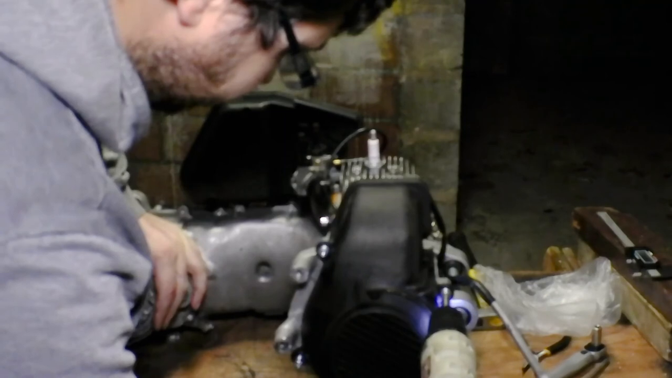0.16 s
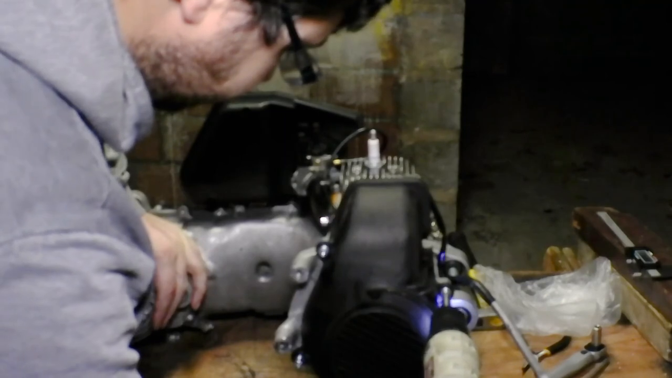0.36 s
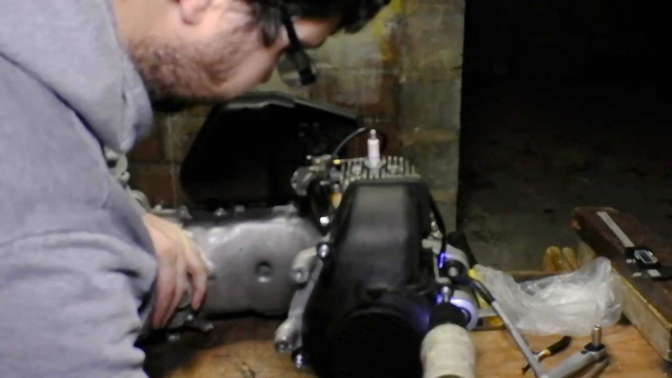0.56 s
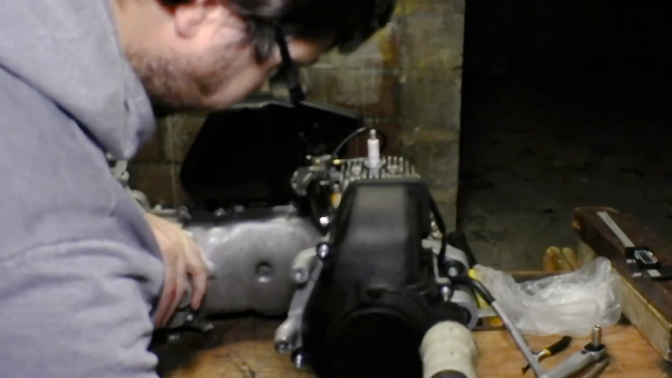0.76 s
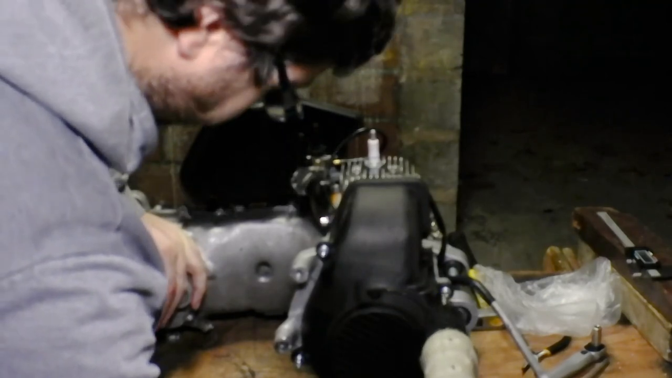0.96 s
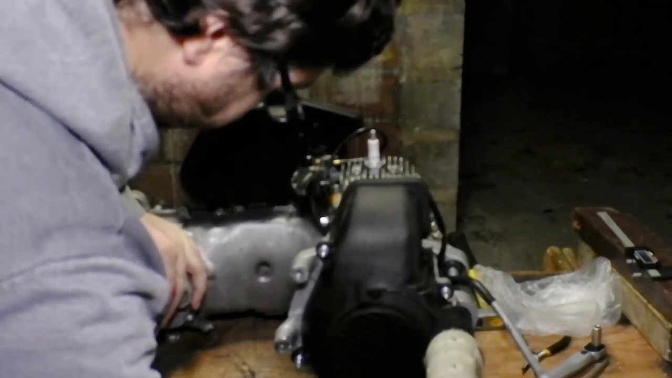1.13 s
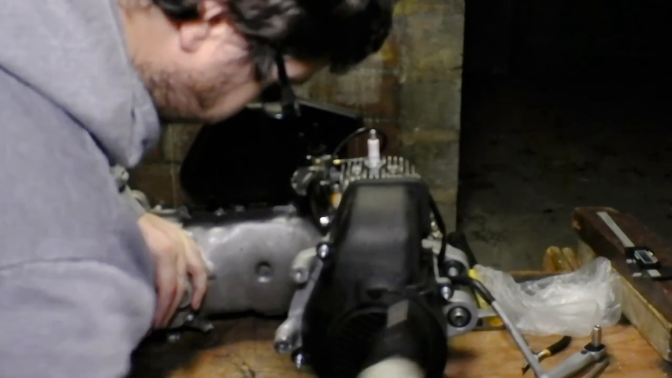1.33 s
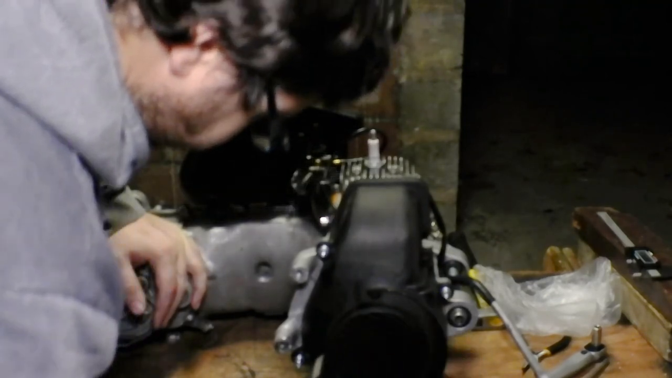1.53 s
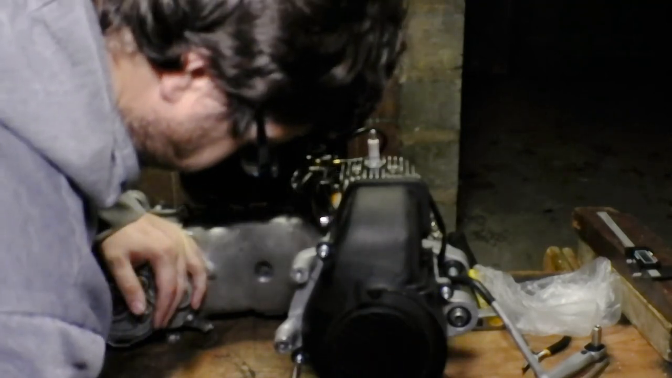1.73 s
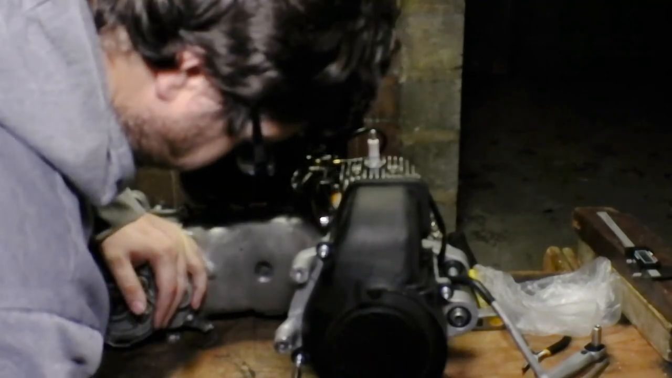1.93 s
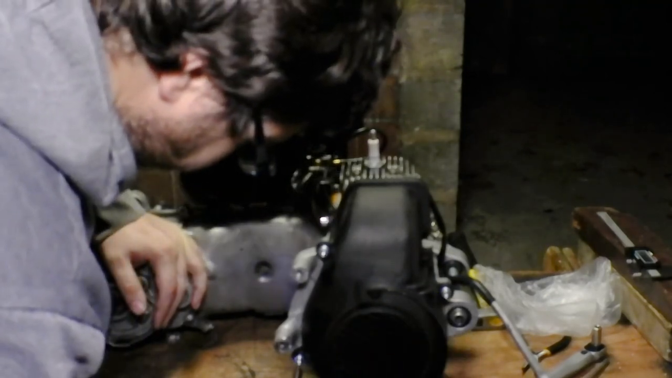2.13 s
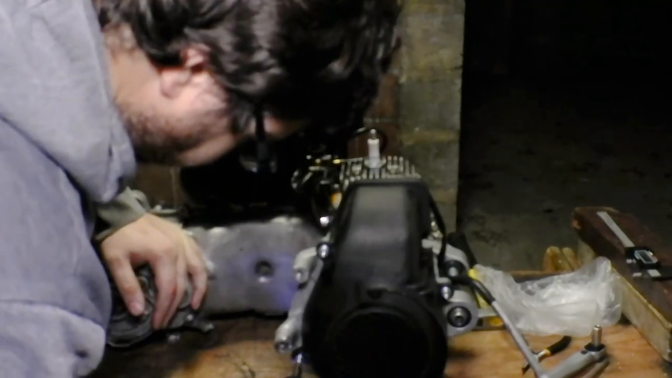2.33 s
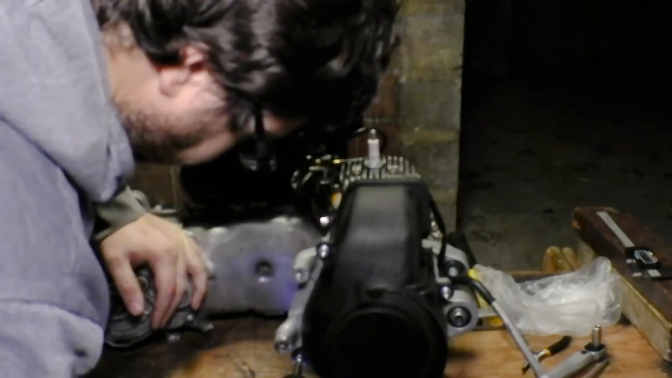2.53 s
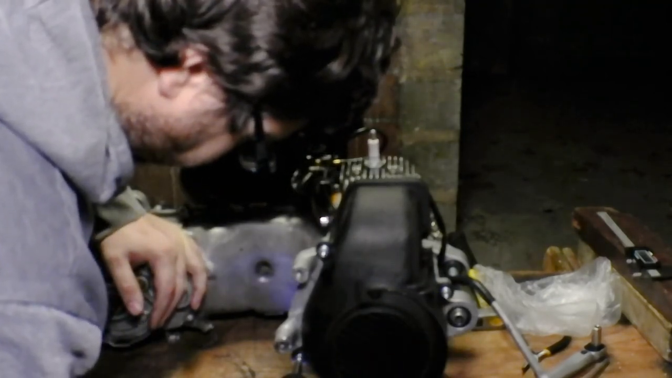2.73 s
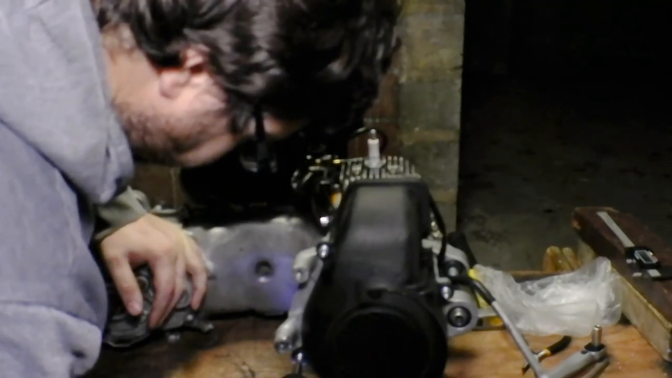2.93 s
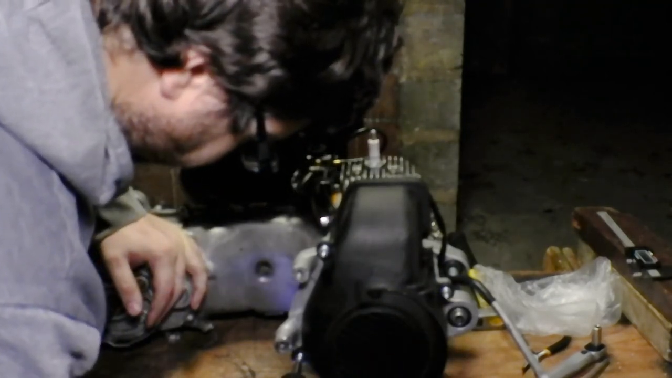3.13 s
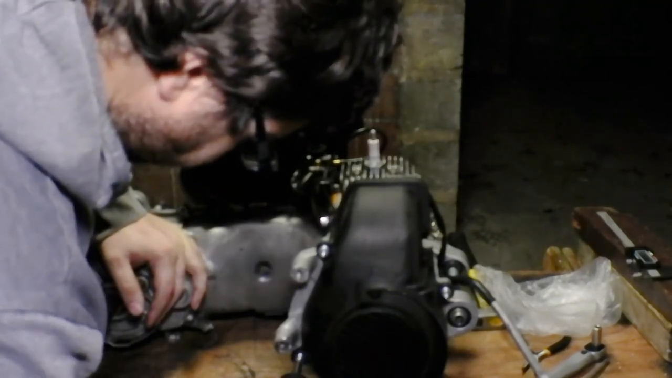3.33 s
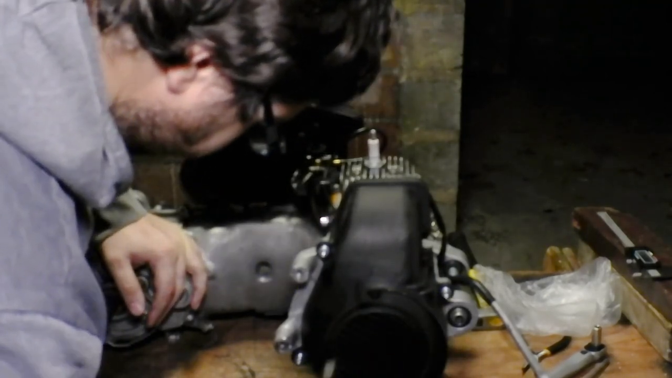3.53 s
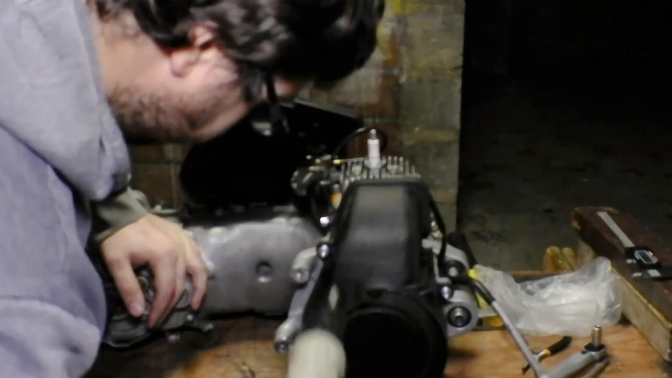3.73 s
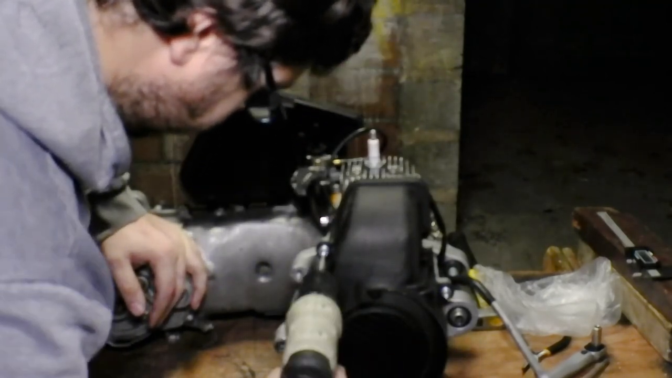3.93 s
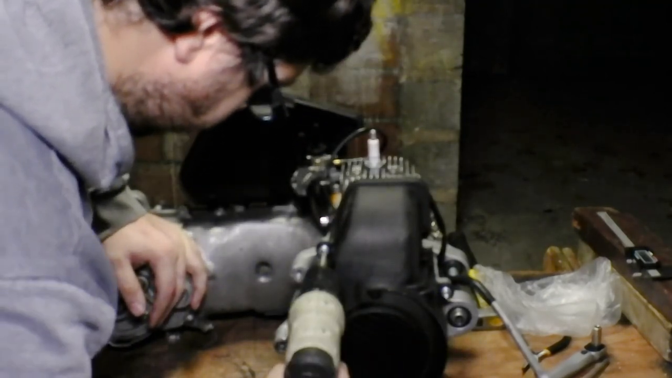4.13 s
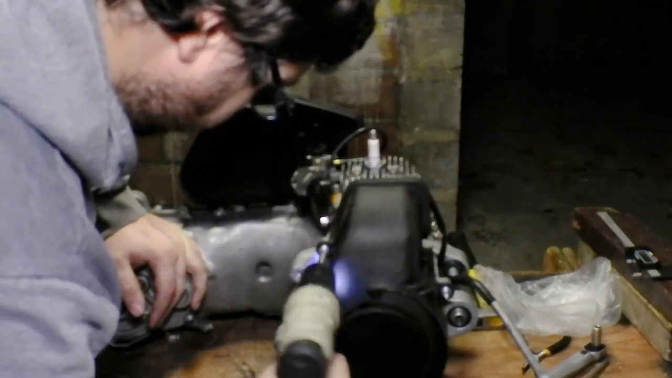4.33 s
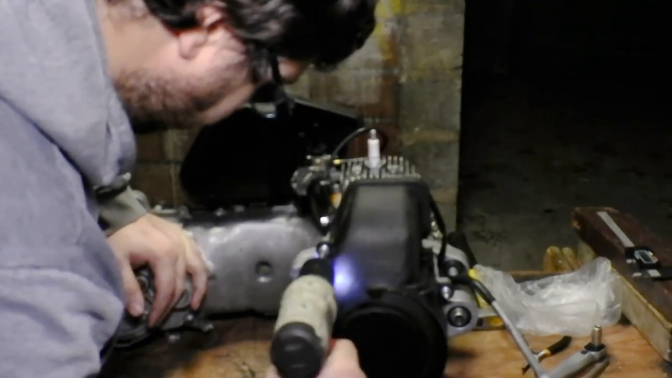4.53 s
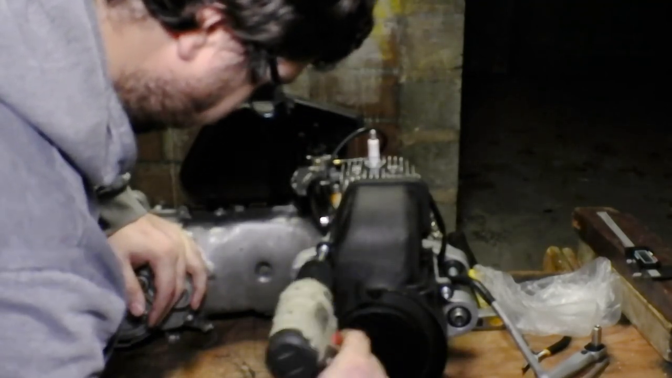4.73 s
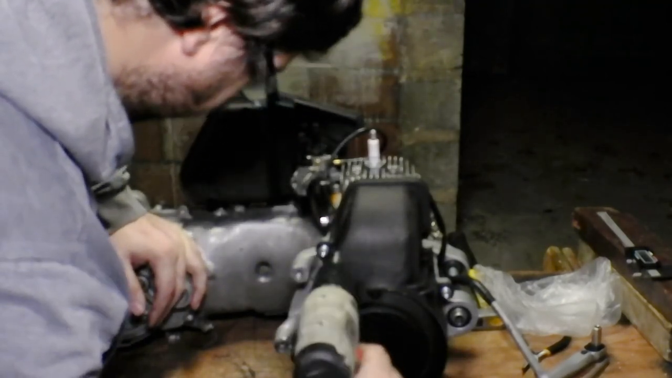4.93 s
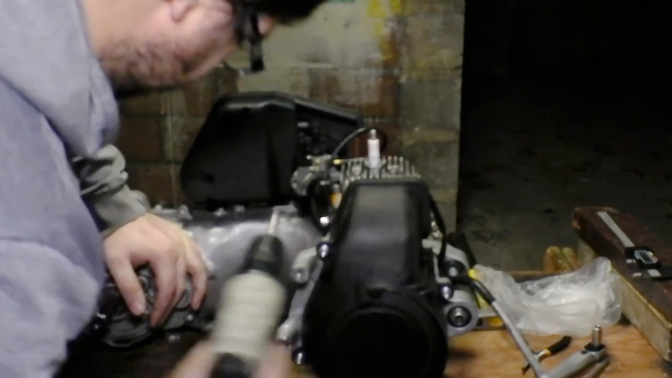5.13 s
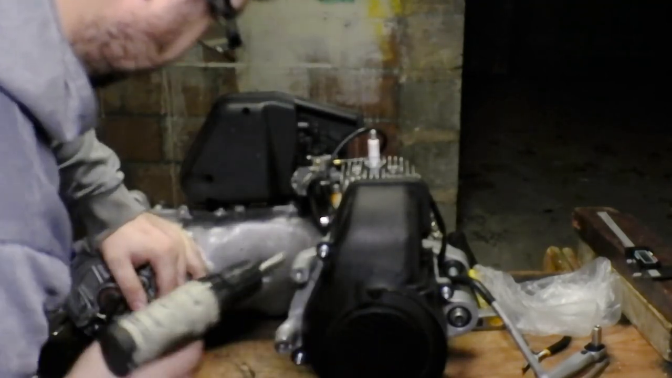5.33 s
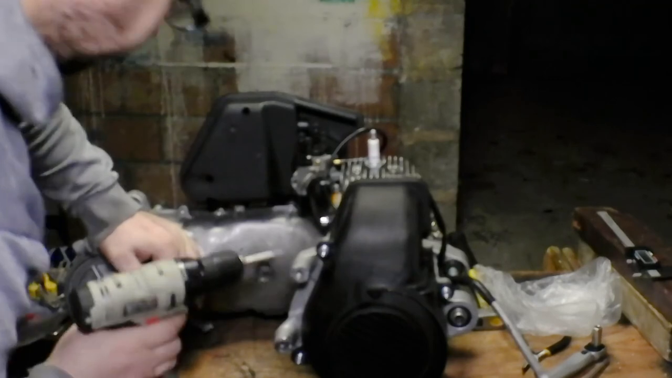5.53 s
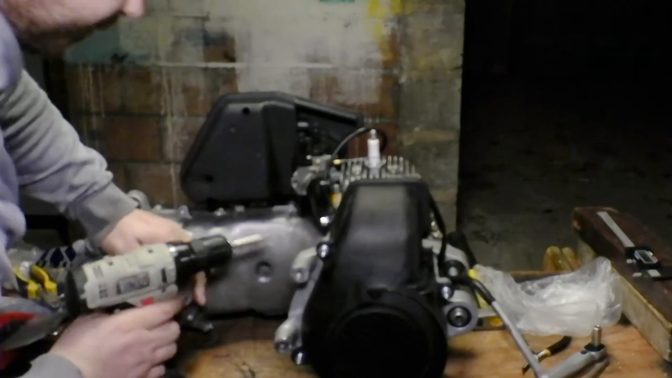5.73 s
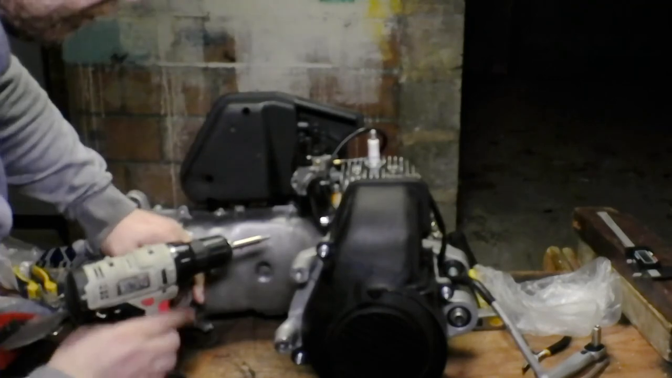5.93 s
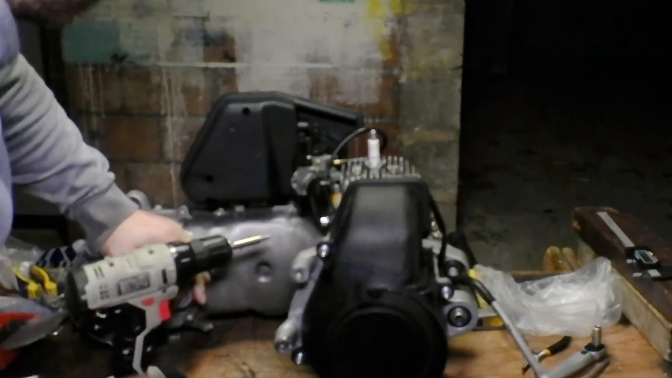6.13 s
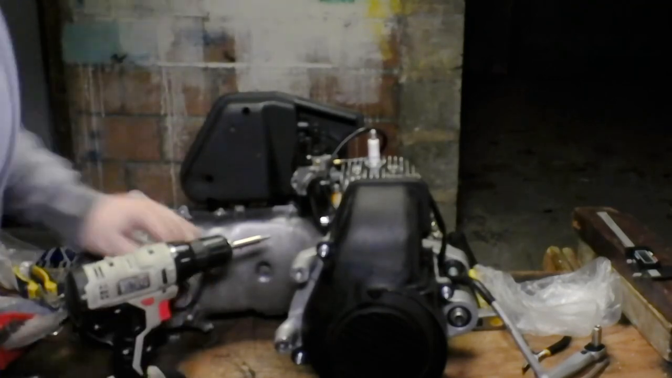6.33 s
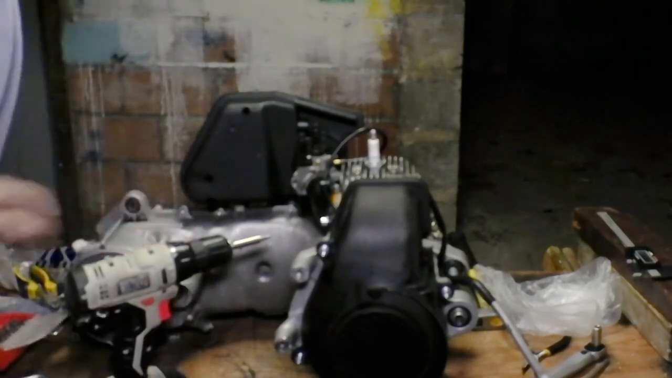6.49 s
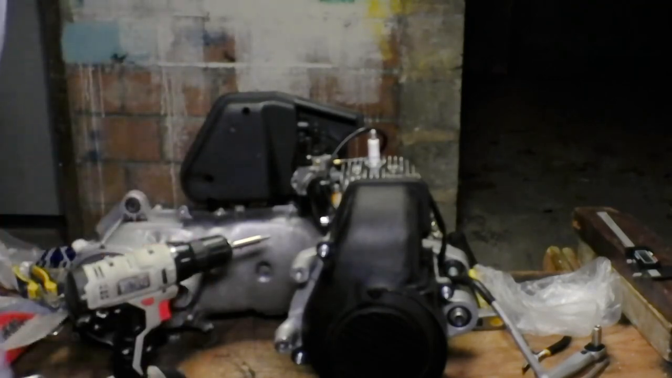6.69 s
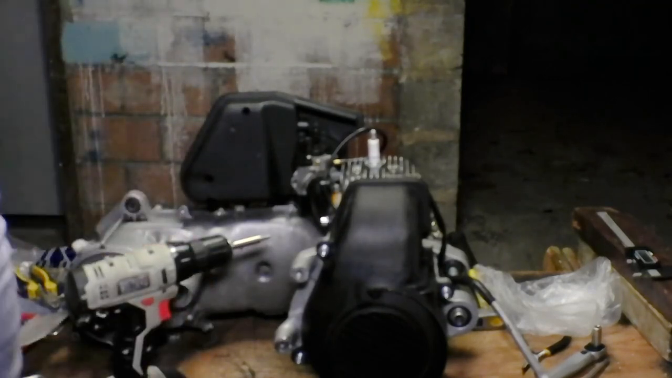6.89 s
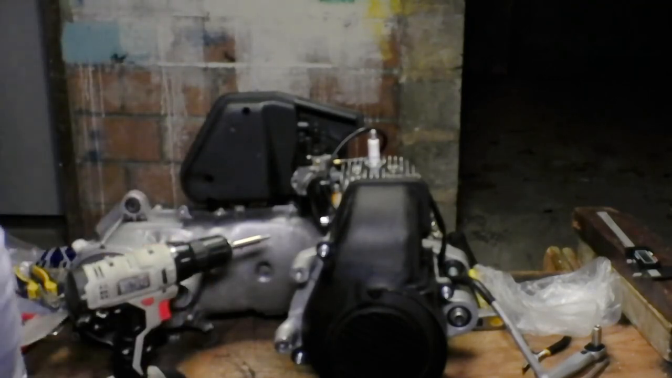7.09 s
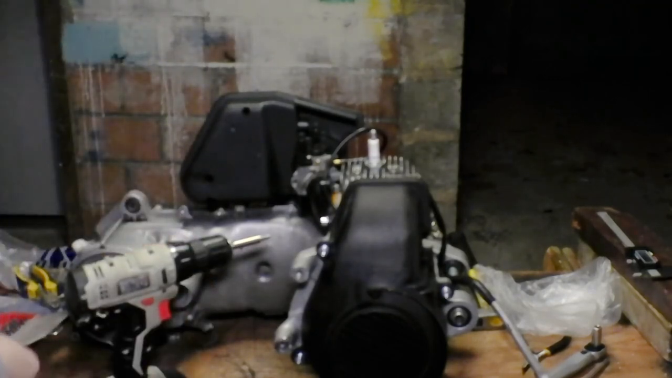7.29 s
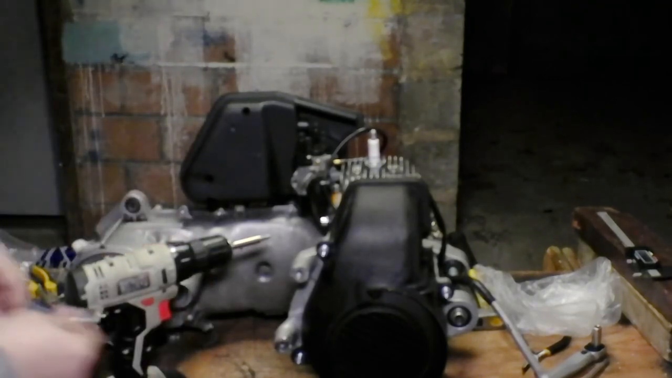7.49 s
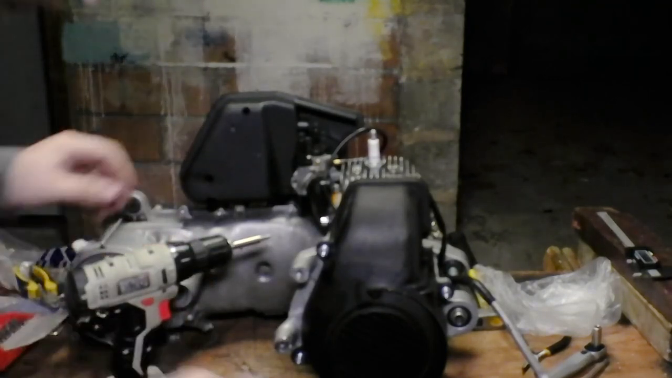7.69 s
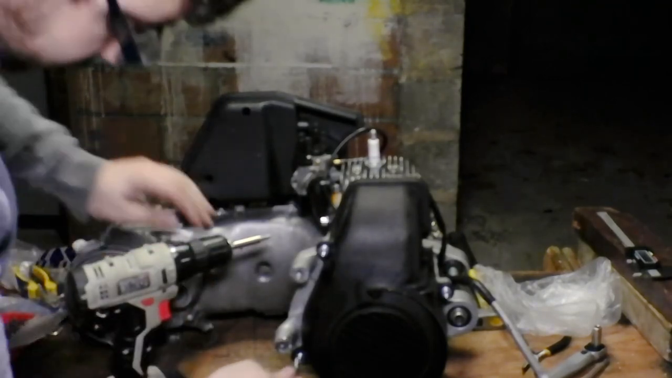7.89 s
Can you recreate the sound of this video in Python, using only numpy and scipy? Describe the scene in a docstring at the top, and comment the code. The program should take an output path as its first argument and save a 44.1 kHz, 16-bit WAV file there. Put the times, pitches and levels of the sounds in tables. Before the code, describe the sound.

A cordless drill is already whirring at the start, a buzzy mid-high motor whine with gear noise. At about 0.35 s the bolt seats with a clink and the clutch rattles in loud, fast metallic chatter until 0.6 s, followed by small chuck clicks near 0.85 s. Quiet room rumble, then light taps around 1.9 s. The motor spins up at 2.1 s with a sharp metal tap, whines steadily, and ratchets from 3.0 to 3.25 s. After a pause, clicks at 4.1-4.3 s lead into a third burst, rattling almost at once until 4.65 s. Strong wooden knocks at 5.4 and 5.5 s, weaker ones to 5.7 s, then a quick rocking flutter. A soft low judder at 6.3 s, faint cloth brush, tiny tool nudges to 7.1 s, a dull tap at 7.6 s and a bright steel clink at 7.9 s. Close, lightly reverberant workshop.

```python
"""A cordless drill-driver runs bolts into a small engine on a wooden bench, in a brick workshop.
It is already whirring; the first bolt seats and the torque clutch rattles, then the bit and chuck clink.
A second bolt is driven the same way after light knocks; a third is tight almost at once.
The drill is stood on the bench and rocks to rest; its foot judders, a sleeve brushes past,
tools are nudged and a small steel part clinks. Motor tones, noise and struck bodies make these sounds."""
import sys
import numpy as np
from scipy import signal
from scipy.io import wavfile

SR = 44100
rng = np.random.default_rng(int(sys.argv[2]) if len(sys.argv) > 2 else 0)


def unload_audio(sound):
    """Save the sound as a 16-bit wav file, at the path given as the first command line argument."""
    columns = np.transpose(np.atleast_2d(sound))
    # keep every value between -1 and 1, then stretch to whole-number steps
    steps = np.round(np.clip(columns, -1, 1) * 32767)
    wavfile.write(sys.argv[1], SR, steps.astype(np.int16))


N = 350595
TIME = np.arange(N) / SR  # t/s

# Trigger pulls, the first already under way: start t/s, bolt seats t/s, stop t/s,
# full speed f/Hz (turns per second), motor level/dB before strain, whine level/dB relative to the motor
PULLS = [(-1, .3616, .615, 343.6, -20.7, -5), (2.12, 2.9772, 3.246, 343.4, -21.5, -5.3),
         (4.288, 4.3246, 4.65, 353.6, -21.5, -12)]
# Hum of the shaft and whine of the commutator: multiple of motor speed, relative level/dB
SHAFT_ORDERS = [(.5, -22), (1, -0.5), (1.5, -15), (2, -7), (3, -9), (4, -15.5), (6, -16), (9, -10),
                (15, -20), (16, -16), (18, -16.5), (19, -21), (21, 0), (22, -12.5), (24, -9.5), (25, -6.5),
                (26, -9), (28, -11.5), (31, -15)]
# Colour of the gear and brush noise: f/Hz, relative level/dB per Hz
GEAR_COLOUR = [(90, -40.5), (170, -22.5), (280, -10.5), (440, -5.5), (520, -2.5), (830, -7), (1150, 1),
               (1550, -1.5), (1850, -7), (3100, -5), (4600, -11), (7000, -6), (10400, -5), (12800, -21.5)]
# Ringing of the drill's housing: f/Hz, relative level/dB, time to fall by 60 dB t60/s
HOUSING_MODES = [(520, -27, .03), (725, -20.5, 0.044), (1154, -7.5, .02), (1490, 0.5, 0.024),
                 (3080, -6.5, .007), (3640, -7.5, 0.0094), (7580, 16.5, 0.0079), (10000, 2, 0.0034)]
# The clutch at each bolt: snap level/dB, chatter level/dB, engine case ring level/dB, jolt level/dB
CLUTCH_LEVELS = [(-14.6, -15.2, -21.5, -18.3), (-14.5, -14.7, -20, -19.5), (-16, -12, -17.5, -20.5)]
# Steel balls landing: f/Hz, relative level/dB per Hz
SNAP_COLOUR = [(60, -22.5), (200, -13), (450, 1), (1000, 1.5), (1500, 0), (2200, -6), (4500, -8.5),
               (6500, 3.5), (8000, 1.5), (10500, -7), (12500, -20), (15000, -55)]
# Loose chatter, one list for each bolt: f/Hz, relative level/dB per Hz
CHATTER_COLOURS = [
    [(24, -47.5), (40, -18.5), (166, -23.5), (197, -14), (377, -4.5), (480, -1), (641, -11.5), (1490, -9),
     (1810, -11.5), (6990, -12), (12800, -26), (16600, -54), (22000, -120)],
    [(24, -68), (40, -21.5), (158, -30.5), (201, -5.5), (239, -22.5), (343, -4), (377, -8.5), (944, -7.5),
     (3920, -14), (7160, -10.5), (12800, -32), (16600, -61), (22000, -120)],
    [(24, -57), (40, -27.5), (311, -19), (480, 0.5), (582, -6.5), (990, -6), (2360, -19.5), (3230, -11.5),
     (4990, -18), (7700, -9.5), (12800, -37), (16600, -63.5), (22000, -120)],
]
# The jolt of a slip, the same colour every time: f/Hz, relative level/dB per Hz
JOLT_COLOUR = [(60, -25.5), (200, -14.5), (400, 0), (500, 2), (750, -3.5), (1000, -2), (1550, -1.5),
               (1900, -11.5), (4000, -23), (9000, -44.5)]

# Bodies that ring when struck: f/Hz, relative level/dB, time to fall by 60 dB t60/s
CASE_MODES = [(206, -14, 0.06), (344, -12, .07), (425, -3, .07), (489, 0.5, 0.1), (548, -4, .07),
              (697, -5.5, 0.066), (830, -3.5, .07), (900, -5.5, .05), (987, 1.5, 0.066), (1040, -6, 0.059),
              (1170, -0.5, 0.087), (1260, -3.5, .04), (1380, -4, .04), (1455, 0, .07), (1504, 1, .07),
              (1554, -3, 0.056), (1640, -8, .05)]  # engine case
BOLT_MODES = [(350, -12, 0.046), (464, -5, 0.06), (725, 2, 0.058), (875, -1, 0.02), (926, 16, 0.037),
              (1100, -4, .035), (1330, -7, 0.044), (1768, -11.5, .03), (3500, -13, .02)]  # bolt heads
BIT_MODES = [(970, -1.5, 0.026), (1850, -15, .04), (2670, -2, 0.14), (3440, 0.5, 0.067), (6050, 1, .035),
             (6970, 0.5, 0.033), (7800, -4.5, 0.035), (10100, -2.5, .04)]  # driver bit
CHUCK_MODES = [(458, -9, .08), (958, -8, .06), (1620, 0, .11), (2175, -4, .07), (2832, -6, .07),
               (3978, -3, .08), (5950, 0, .03), (7400, -3, .06)]  # rattling chuck
BENCH_MODES = [(214, -22.5, 0.13), (313, -9, 0.033), (413, 0, 0.028), (481, 20, 0.047), (520, -2, .05),
               (624, -11.5, 0.07), (770, -5.5, 0.047), (950, -11, .04), (1160, -11, .045),
               (1357, -14, .045)]  # bench top
TOOL_MODES = [(485, -9, 0.22), (530, -21.5, 0.24), (728, -8.5, 0.085), (960, -27, .07), (1400, 2, 0.044),
              (1534, -10, .07), (2160, -7, 0.03)]  # loose tools
PART_MODES = [(1010, 1, 0.031), (2630, -4, 0.054), (3560, -1, .03), (6300, 8, 0.033), (6710, -1, 0.033),
              (8470, 2, 0.031), (9800, -7, .04)]  # small steel part

# Blows: t/s, ring peak level/dB, contact time t/ms, crack level/dB, crack decay t/s
BOLT_TAPS = [(1.917, -39.5, .3, -48, 0.0041), (1.932, -36, 0.33, -47, 0.0026),
             (1.974, -27.5, 0.26, -37, 0.0049), (2.091, -35, 0.12, -43.5, 0.03),
             (2.1668, -7, 0.4, -29, 0.014), (4.107, -17, 0.12, -25, 0.0061),
             (4.154, -34.5, 0.13, -33.5, 0.015), (4.1575, -13, 0.31, -37, 0.0039),
             (4.278, -24, .45, -34, .03), (4.302, -18, .9, -27, .03)]  # bit on bolt heads
BIT_CLINKS = [(.351, -8.5, 0.14, -6, 0.0028), (3.2305, -22, 0.11, -7, 0.0026), (4.3135, -15, .2, -11, .005),
              (4.627, -20, 0.075, -9.5, .003)]  # ringing of the bit
CHUCK_CLICKS = [(.853, -28, .05, -19.7, .0072), (.884, -33, .2, -30.5, .005)]  # the bit is pulled off the tight bolt and the chuck rattles
BENCH_KNOCKS = [(.718, -28.5, 0.6, -43, .004), (1.976, -29.5, 0.62, -47, 0.0043),
                (1.995, -29, 0.8, -42, 0.0036), (5.3712, 4, 0.63, -7.5, 0.007),
                (5.5306, 1.5, 0.75, -19, 0.011), (5.568, -34, 0.93, -27, 0.0047),
                (5.6455, -8, 0.47, -28, 0.012), (5.697, -38, 0.95, -19.5, 0.0055),
                (5.701, -6, 0.43, -26, 0.021), (5.729, -21, .7, -24.5, 0.0056),
                (7.577, -24, 0.75, -46, 0.005)]
TOOL_NUDGES = [(1.155, -41, 0.033, -45.5, .012), (5.939, -36, 0.054, -45, 0.03),
               (6.486, -51, .1, -46, 0.0088), (6.795, -39, 0.83, -44.5, 0.015),
               (6.917, -29.5, 0.33, -42, .02), (6.943, -29.5, 0.91, -48, 0.079),
               (7.075, -49, .3, -44, 0.022), (7.092, -35.5, 0.82, -46, .01)]
PART_CLINKS = [(7.9245, -14, 0.03, -33, 0.0055), (7.936, -27, .03, -41, .004)]

# Colour of each kind of crack: f/Hz, relative level/dB per Hz
TAP_CRACK = [(100, -22.5), (420, 0.5), (1200, 4), (2500, -8.5), (3600, -5), (5000, -17), (9500, -16.5),
             (12500, -28), (15000, -58)]
CLINK_CRACK = [(100, -17.5), (500, -5.5), (1600, 0), (3000, -2), (5000, -7), (7000, -1.5), (10000, -6),
               (12500, -14.5), (15000, -49.5)]
BENCH_CRACK = [(80, -28), (250, -10), (700, 9.5), (1400, -0.5), (2500, -18.5), (5000, -27.5), (9000, -29.5),
               (12500, -40.5), (15000, -52.5)]
TOOL_CRACK = [(150, -5.5), (500, 5), (900, -1), (1400, -3.5), (2200, -10), (3500, -22), (8000, -20),
              (13000, -22.5)]

# Strokes: start t/s, attack t/s, hold t/s, release t/s, level/dB, sag/dB per s
FOOT_JUDDER = (6.307, .014, .065, .012, -34, 70)  # the foot judders over the wood as the hand lets go
SLEEVE_BRUSH = (6.47, .03, .35, .07, -55.5, 14)  # a sleeve brushes past
# Ringing under the juddering foot: f/Hz, relative level/dB, time to fall by 60 dB t60/s
FOOT_MODES = [(278, -4, 0.036), (331.6, 2, 0.069), (425, -6, 0.035)]
# Hiss of cloth: f/Hz, relative level/dB per Hz
CLOTH_COLOUR = [(300, -1), (1200, -2), (2200, 0.5), (3000, -6), (5000, -27), (12000, -33)]

# Room rumble and hiss: f/Hz, relative level/dB per Hz
BACKGROUND_COLOUR = [(15, -62), (25, -32.5), (37, -29), (53, -14.5), (102, 0), (126, -11), (186, -3),
                     (248, -10), (276, -1.5), (367, -8.5), (397, -1), (430, -13), (558, -9), (743, -15.5),
                     (12800, -24.5), (16600, -50.5), (22000, -120)]
# Echoes from the walls: f/Hz, time to fall by 60 dB t60/s
ROOM_DECAY = [(100, 0.24), (300, 0.49), (600, 0.32), (1500, 0.34), (3500, .37), (8000, 0.25), (13000, 0.37)]
# Low tones standing between the walls: f/Hz, relative level/dB, time to fall by 60 dB t60/s
STANDING_MODES = [(98, -9, 2.4), (204, -3.5, 2.5), (269.7, 2, 1.4), (390, -11, 1.9)]

SPIN_UP_S, BRAKE_S = .026, .025
LOUDNESS_POWER, STRAIN_DB, STRAIN_S = 1.25, 2.2, .06  # louder with speed, and again under strain
CREEP_S, CREEP_DB, WHISTLE_HZ, WHISTLE_DB = .02, -41, 3350, -47
TURNS_PER_SLIP, LAST_SLIP_S = 5, .033  # slipping ends this long before the motor stops
TIGHTEN_DB_PER_S = 8  # the tighter the bolt, the more of each slip reaches the case
JOLT_LEAD_S = .001  # the balls push off the cam just before they land
RECOIL_LEAD_S = .03
ROCK_START_S, ROCK_GAP_S, ROCK_SHRINK = 5.7615, .022, .9  # each gap is .9 of the one before
ROCK_DB, ROCK_LOSS_DB, ROCK_CONTACT_MS = -22, .4, 1.55  # the loss is per bump
BACKGROUND_DB = -56
EDGE_HZ = 12850


def motor(wobble=0.0009, gears_db=-3, housing_db=-8, bite=0.41, flutter_db=0.8, waver=.35, surge_db=-1.5):
    """Shaft tones sing over once-a-turn gear and brush noise; three poles growl under starting current."""
    speed, level, singing, surge = np.zeros((4, N))
    for start, seat, stop, full_hz, motor_db, whine_db in PULLS:
        share = throttle(start, stop)
        strain = 1 - np.exp(-np.maximum(TIME - seat, 0) / STRAIN_S)
        speed += full_hz * share
        level += amp(motor_db + STRAIN_DB * strain) * share ** LOUDNESS_POWER
        singing += amp(whine_db) * share ** 4
        surge += 4 * share * (1 - share) * (TIME < seat)  # strongest at half speed
    on = level > 0
    angle = 2 * np.pi * np.cumsum(speed * (1 + wobble * wander(60))) / SR

    whine = np.zeros(N)
    for order, db in SHAFT_ORDERS:
        unsteady = 1 + waver * order / (order + 2) * wander(25)[on]  # high orders are the least steady
        start_phase = 2 * np.pi * rng.random()
        whine[on] += amp(db) * unsteady * np.sin(order * angle[on] + start_phase)
    whine = singing * whine / np.std(whine[on])
    growl = amp(surge_db) * surge * np.sin(3 * angle)

    turn_pulse = np.exp(bite * np.cos(angle))
    rub = unit(rng.standard_normal(N) * turn_pulse * amp(flutter_db * wander(120)))
    gear_noise = amp(gears_db) * through(rub, colour(GEAR_COLOUR))
    housing_ring = amp(housing_db) * through(rub, ring(HOUSING_MODES))
    noise = gear_noise + housing_ring
    return level * (whine + growl + noise) + amp(CREEP_DB) * creeping() * noise


def throttle(start, stop):
    """Share of full speed during one pull: the rotor gathers speed, runs, and is braked."""
    since, left = np.maximum(TIME - start, 0), np.maximum(stop - TIME, 0)
    spin_up = since ** 2 / (since ** 2 + SPIN_UP_S ** 2)
    return spin_up * (1 - np.exp(-left / BRAKE_S))


def creeping():
    """Short swell around each pull's start, while the trigger is barely pressed and the gears creep."""
    return sum(np.exp(-((TIME - start) / CREEP_S) ** 2) for start, *_ in PULLS)


def whistle():
    """Chopped current makes the windings whistle briefly as each pull begins."""
    return amp(WHISTLE_DB) * creeping() * np.sin(2 * np.pi * WHISTLE_HZ * TIME)


def clutch(snap_s=0.0023, chatter_s=.012, uneven_db=0.64):
    """Balls jump their cam every fifth motor turn: a snap, loose chatter, and a blow into the engine case."""
    out, t = np.zeros(N), TIME[:4000]
    for pull, levels, chatter_colour in zip(PULLS, CLUTCH_LEVELS, CHATTER_COLOURS):
        start, seat, stop, full_hz, *_ = pull
        snap_db, chatter_db, case_db, jolt_db = levels
        slipping = (TIME >= seat) & (TIME < stop - LAST_SLIP_S)
        slips = pulses(full_hz * throttle(start, stop)[slipping] / TURNS_PER_SLIP)
        slips = unit(slips * amp(uneven_db * rng.standard_normal(N)[slipping]))
        slips = np.pad(slips, (0, len(t)))  # room for the last slip to die away
        tight = amp(TIGHTEN_DB_PER_S * (TIME[:len(slips)] - (stop - seat) / 2))
        add(out, seat, amp(case_db) * through(slips * tight, ring(CASE_MODES)))
        add(out, seat - JOLT_LEAD_S, amp(jolt_db) * through(slips, colour(JOLT_COLOUR)))

        snap = (snap_db, snap_s, SNAP_COLOUR)
        chatter = (chatter_db, chatter_s, chatter_colour)
        for db, decay_s, points in (snap, chatter):
            fade = np.exp(-2 * t / decay_s) * 2 / (decay_s * SR)
            power = abs(through(slips ** 2, fade))
            grit = np.sqrt(power) * rng.standard_normal(N)[:len(slips)]
            add(out, seat, amp(db) * through(grit, colour(points)))
    return out


def recoil(ring_db=-16, contact_ms=.8, crack_db=-42, crack_s=.004):
    """Braking twists the engine case: one dull blow into it near the end of each pull."""
    rows = [(stop - RECOIL_LEAD_S, ring_db, contact_ms, crack_db, crack_s) for _, _, stop, *_ in PULLS]
    return blows(rows, CASE_MODES, TAP_CRACK)


def blows(rows, modes, crack_spectrum):
    """A push rings the body (the longer the contact, the duller) while the surfaces crack briefly."""
    out, body, crack_colour = np.zeros(N), ring(modes), colour(crack_spectrum)
    t = np.arange(len(body)) / SR
    for s, ring_db, contact_ms, crack_db, crack_s in rows:
        u = 1000 * t / contact_ms  # time counted in contact times
        push = u * np.exp(-2 * u)
        tone = through(body, push)
        crack = through(rng.standard_normal(len(t)) * np.exp(-t / crack_s), crack_colour)
        add(out, s, amp(ring_db) * tone / abs(tone).max() + amp(crack_db) * crack)
    return out


def rocking(count=4, crack_db=-49, crack_s=.0045):
    """Lists the blows of the drill rocking to rest on its foot, in ever quicker, weaker bumps."""
    gaps = ROCK_GAP_S * ROCK_SHRINK ** np.arange(count - 1)
    times = ROCK_START_S + np.cumsum(np.r_[0, gaps])
    return [(s, ROCK_DB - k * ROCK_LOSS_DB, ROCK_CONTACT_MS, crack_db, crack_s) for k, s in enumerate(times)]


def handling(judder_hz=72, uneven=.25, soft_hz=450):
    """Rubber sticks and slips softly on wood; cloth hisses."""
    rate = judder_hz * amp(2 * wander(70)) * (1 + uneven * np.tanh(wander(50)))
    soften = signal.butter(3, soft_hz, fs=SR, output="sos")
    slips = signal.sosfilt(soften, pulses(rate))
    foot = unit(through(slips, ring(FOOT_MODES)))
    cloth = through(rng.standard_normal(N), colour(CLOTH_COLOUR))
    return swell(*FOOT_JUDDER) * foot + swell(*SLEEVE_BRUSH) * cloth


def swell(start, attack_s, hold_s, release_s, db, sag_db_per_s):
    """Gain of a stroke: it rises, sags while it is held, and dies away."""
    t = np.maximum(TIME - start, 0)
    rise = np.minimum(t / attack_s, 1) ** 2
    release = np.exp(-np.maximum(t - attack_s - hold_s, 0) / release_s)
    return rise * amp(db - sag_db_per_s * t) * release


def workshop(x, near_db, near_s, tail_db, standing_db):
    """Quick reflections from bench and engine, a short brick-wall tail, and lingering low room tones."""
    t = TIME[:SR]
    near, far = rng.choice([-1., 1.], (2, SR)) * (rng.random((2, SR)) < .1)  # scattered single echoes
    near = near * np.exp(-t / near_s) * (t > .0035)
    hz, at, bands = signal.stft(far * (t > .013), SR, nperseg=256)
    fade = amp(-60 * at / read(ROOM_DECAY, hz)[:, None])  # each pitch dies at its own pace
    tail = signal.istft(bands * fade, SR, nperseg=256)[1][:SR]
    echoes = amp(near_db) * near / np.linalg.norm(near) + amp(tail_db) * tail / np.linalg.norm(tail)
    standing = amp(standing_db) * through(x, ring(STANDING_MODES, size=90000))
    return x + through(x, echoes) + standing


def background():
    """Steady room rumble and microphone hiss, made from coloured noise."""
    return amp(BACKGROUND_DB) * through(rng.standard_normal(N), colour(BACKGROUND_COLOUR, size=8192))


def amp(db):
    """Turns decibels into gain."""
    return 10 ** (np.asarray(db) / 20)


def unit(x):
    """Scales to rms 1."""
    return x / np.sqrt(np.mean(x ** 2) + 1e-20)


def read(points, hz):
    """Reads between (f/Hz, value) points on a log-frequency axis."""
    f, value = np.transpose(points)
    return np.interp(np.log(hz + 1), np.log(f + 1), value)


def add(mix, s, sound):
    """Mixes a sound in at time s, in seconds."""
    part = mix[max(round(s * SR), 0):][:len(sound)]
    part += sound[:len(part)]


def through(x, response):
    """Sends a sound through a response (convolution), keeping its length."""
    return signal.oaconvolve(x, response)[:len(x)]


def colour(points, size=4096):
    """Response of energy 1 with the given spectrum, starting at once (minimum phase)."""
    level_db = read(points, abs(np.fft.fftfreq(size, 1 / SR)))
    log_gain = np.log(amp(np.maximum(level_db, -100)))
    response = np.fft.ifft(np.exp(signal.hilbert(log_gain).conj())).real
    return response / np.linalg.norm(response)


def ring(modes, size=12000):
    """Response of energy 1 of a body with dying modes; it radiates little below its first listed one."""
    t = np.arange(size) / SR
    response = sum(amp(db - 60 * t / t60) * np.sin(2 * np.pi * hz * t) for hz, db, t60 in modes)
    low_cut = signal.butter(2, modes[0][0], "high", fs=SR, output="sos")
    response = signal.sosfilt(low_cut, response)
    return response / np.linalg.norm(response)


def wander(hz):
    """Slow random drift of rms 1, changing about hz times a second."""
    return unit(np.interp(TIME * hz, np.arange(4000), rng.standard_normal(4000)))


def pulses(rate):
    """One click at the start, then one at each whole turn of a rate curve."""
    return np.diff(np.floor(np.cumsum(rate) / SR), prepend=-1)


def scene():
    """Drill, metal clinks, bench knocks and handling in the room, over the background."""
    drill = motor() + whistle() + clutch() + recoil()
    metal = blows(BOLT_TAPS, BOLT_MODES, TAP_CRACK) + blows(BIT_CLINKS, BIT_MODES, CLINK_CRACK)
    metal += blows(CHUCK_CLICKS, CHUCK_MODES, CLINK_CRACK) + blows(PART_CLINKS, PART_MODES, CLINK_CRACK)
    bench = blows(BENCH_KNOCKS + rocking(), BENCH_MODES, BENCH_CRACK)
    bench += blows(TOOL_NUDGES, TOOL_MODES, TOOL_CRACK) + handling()
    drill = workshop(drill, near_db=-6, near_s=0.0071, tail_db=-15, standing_db=-41.5)
    metal = workshop(metal, near_db=-4, near_s=0.011, tail_db=-10.5, standing_db=-32.5)
    bench = workshop(bench, near_db=-7.0, near_s=0.027, tail_db=-21.5, standing_db=-48.5)
    return (drill + metal + bench + background())[None]


def record(dry, knee=6):
    """The loudest peaks overload the microphone input; then the lowest and highest pitches are cut."""
    clipped = dry / (1 + abs(dry / .84) ** knee) ** (1 / knee)
    low_cut = signal.butter(1, 25, "high", fs=SR, output="sos")
    coupled = signal.sosfilt(low_cut, clipped)
    high_cut = signal.firwin(511, EDGE_HZ, window=("kaiser", 8), fs=SR)
    return signal.oaconvolve(coupled, high_cut[None], "same")


dry = scene()
out = record(dry)
unload_audio(out)
```